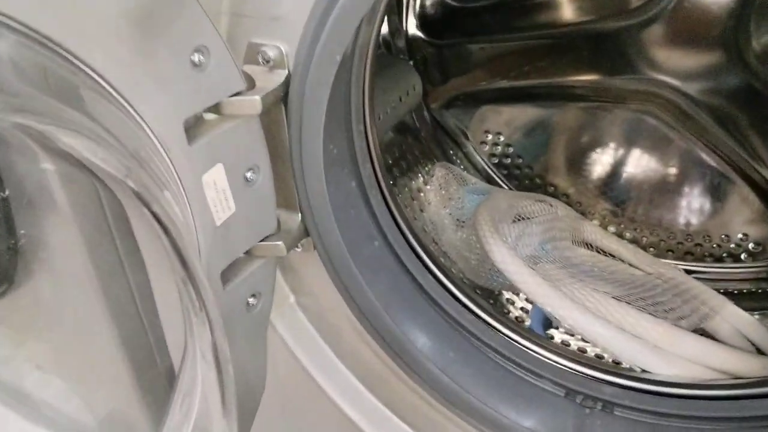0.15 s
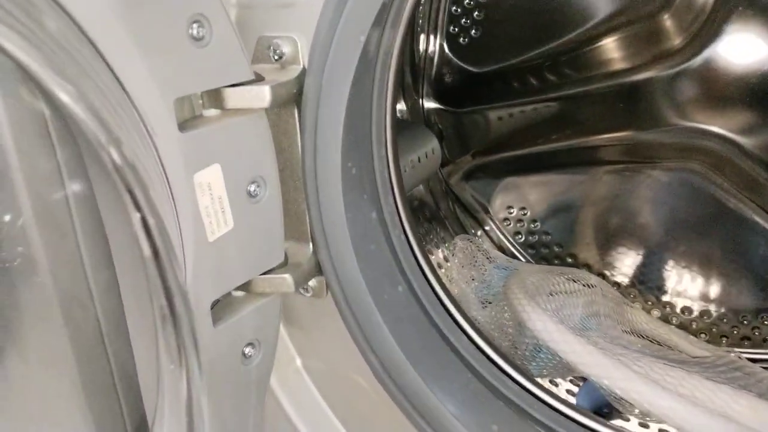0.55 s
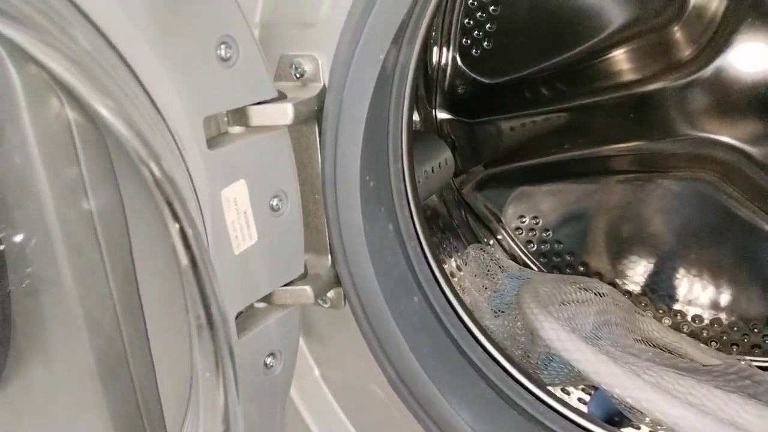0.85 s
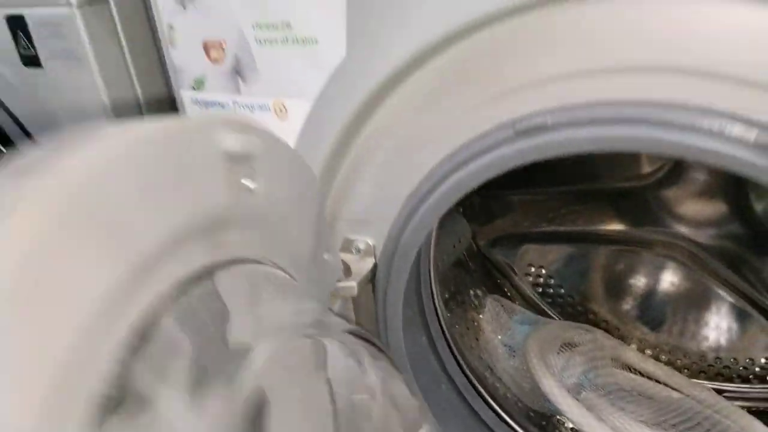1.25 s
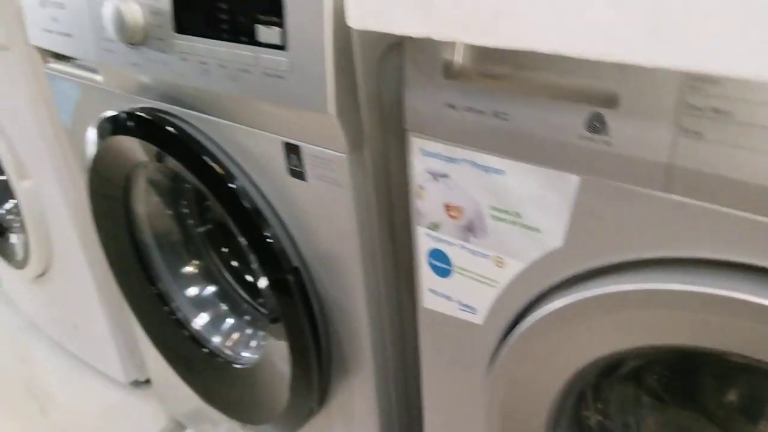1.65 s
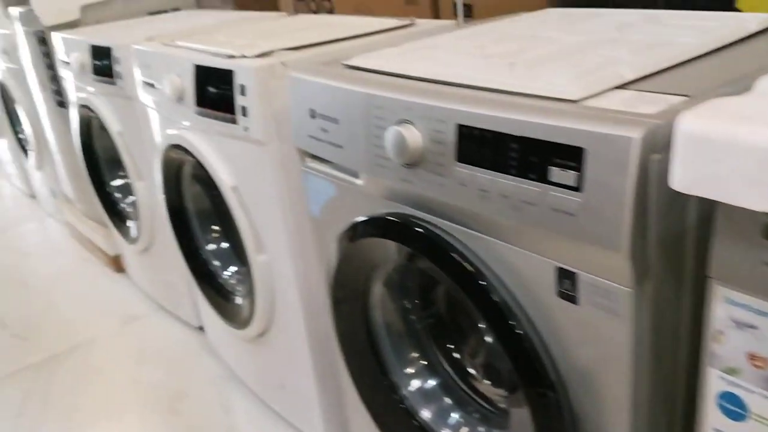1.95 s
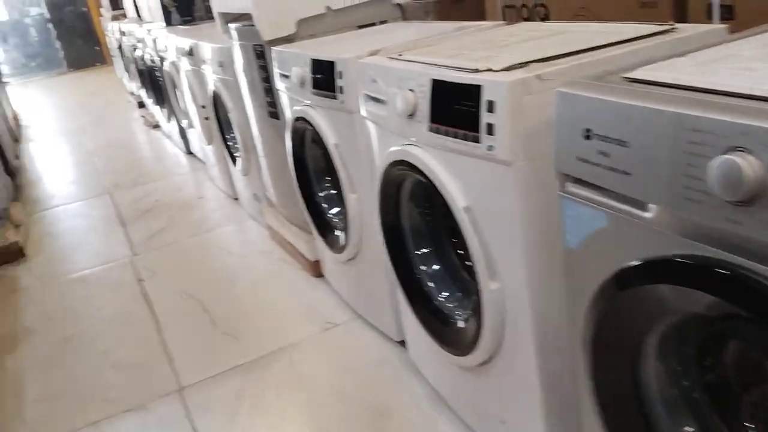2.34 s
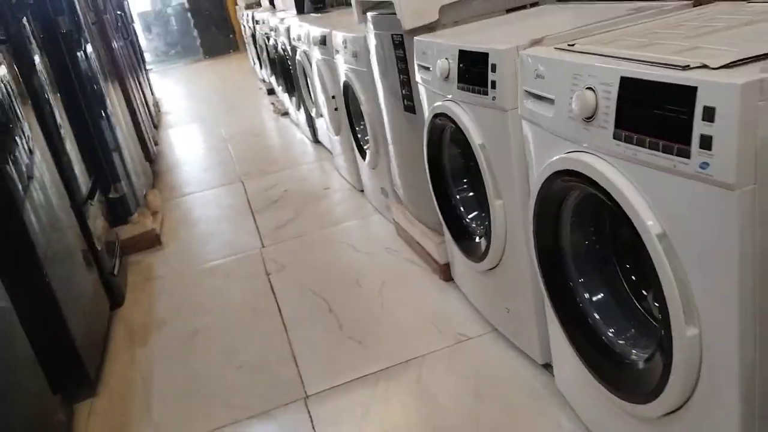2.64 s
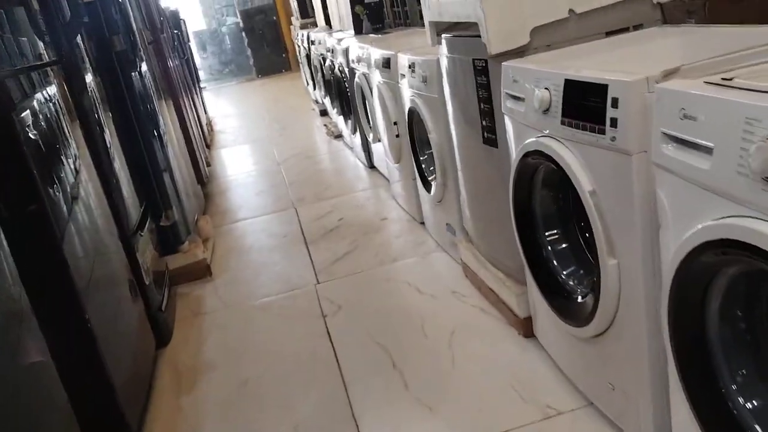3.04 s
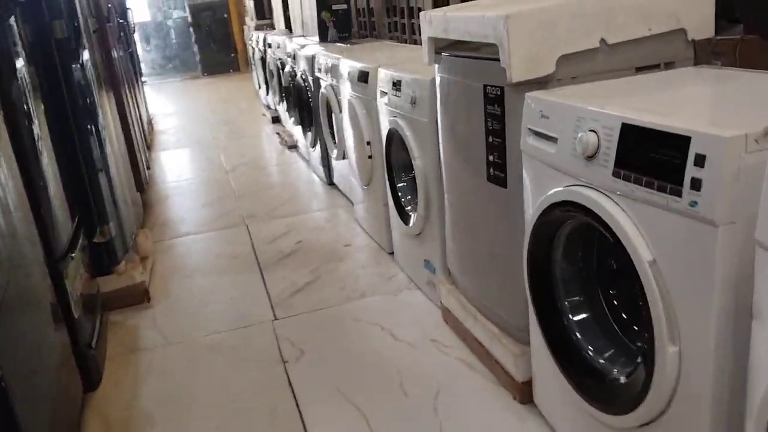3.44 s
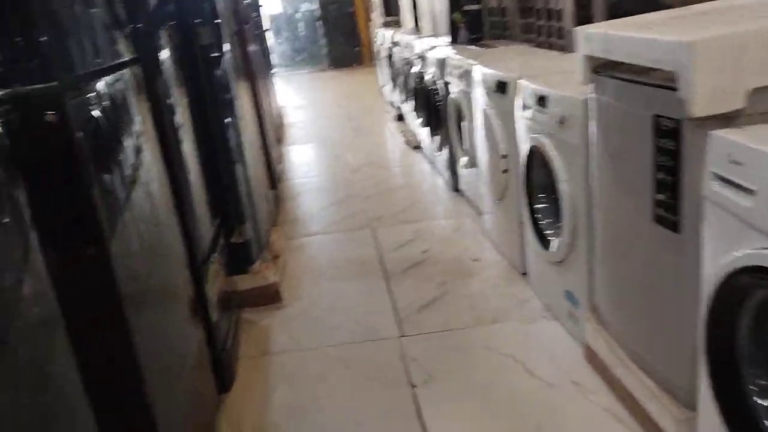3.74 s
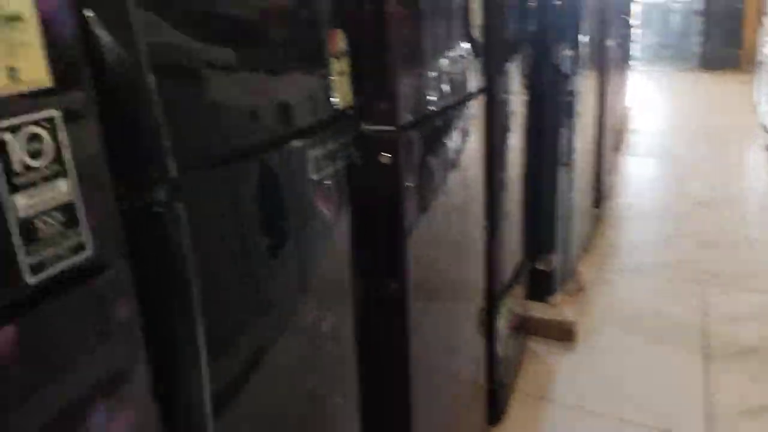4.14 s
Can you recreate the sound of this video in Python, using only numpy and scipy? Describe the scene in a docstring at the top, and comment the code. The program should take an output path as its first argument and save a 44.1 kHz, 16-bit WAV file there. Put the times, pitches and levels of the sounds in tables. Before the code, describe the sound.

Faint distant metal clinks and cloth rustle, then a close appliance door clunks shut and echoes; later, dull bumps on the microphone and sleeve rustling.

```python
"""A showroom's hum and a faint sleeve come first; metal clinks far off, then a washing machine's door shuts close by.
The latch snaps and rings its rim (noise bursts, dying sines), and the cabinet booms into the hall.
Fingers bump the hand-held camera beside its left microphone (dispersed pulses) and the sleeve rustles again.
Cloth, ticks and air are shaped noise; squeaks and hum are wavering sines."""
import sys
import numpy as np
from scipy import signal
from scipy.fft import rfft, irfft
from scipy.io import wavfile
from scipy.ndimage import uniform_filter1d

SR = 44100
rng = np.random.default_rng(int(sys.argv[2]) if len(sys.argv) > 2 else 0)


def file_out(sig):
    """Save sig as 16-bit WAV at sys.argv[1]."""
    # one column per channel
    cols = np.atleast_2d(sig).T
    # limit, then scale
    lim = np.clip(cols, -1, 1)
    pcm = np.round(lim * 32767).astype(np.int16)
    wavfile.write(sys.argv[1], SR, pcm)


N = 188994  # length [samples]


def amp(db):
    """Decibels to gain."""
    return 10 ** (np.asarray(db) / 20)


def unit(x):
    """Scales to rms 1."""
    return x / np.sqrt(np.mean(x ** 2) + 1e-20)


def read(points, hz):
    """Reads a table on a log-frequency axis."""
    f, value = np.transpose(points)
    return np.interp(np.log(hz + 1), np.log(f + 1), value)


def add(mix, s, sound):
    """Mixes a sound in at time s [s]."""
    part = mix[..., max(round(s * SR), 0):][..., :sound.shape[-1]]
    part += sound[..., :part.shape[-1]]


def ring(x, response):
    """Convolves, keeping the length."""
    full = signal.fftconvolve(np.atleast_2d(x), np.atleast_2d(response), axes=1)
    return full[:, :x.shape[-1]]


def fade(t, t60):
    """Exponential decay that falls 60 dB in t60 [s]."""
    return np.exp(-np.log(1000) * t / t60)


def modes(table, t):
    """One dying sine for each mode, as rows."""
    return np.array([amp(db) * np.sin(2 * np.pi * hz * t) * fade(t, t60) for hz, db, t60 in table])


def wander(rate_hz, channels=1):
    """Slow random motion of rms 1: noise without its fast part."""
    hz = np.fft.rfftfreq(N, 1 / SR)
    noise = rfft(rng.standard_normal((channels, N)))
    return unit(irfft(noise * np.exp(-(hz / rate_hz) ** 2), N))


# likeness of diffuse sound at the left and right microphones: (frequency [Hz], correlation [-1 to 1])
MIC_LIKENESS = [(60, 1), (300, 0.58), (700, -0.12), (1200, -0.62), (3000, .5), (6000, -0.02),
                (12000, -0.12)]


def diffuse(points):
    """Noise of a given spectrum at two microphones, alike in the bass."""
    hz = np.fft.rfftfreq(N, 1 / SR)
    left, other = rfft(rng.standard_normal((2, N)))
    same = np.clip(read(MIC_LIKENESS, hz), -1, 1)
    right = same * left + np.sqrt(1 - same ** 2) * other
    return unit(irfft(np.array([left, right]) * amp(read(points, hz)), N))


def tail(points, t60s):
    """A dense response, of energy 1 on the left, in which each band dies at its own speed."""
    hz, t, z = signal.stft(diffuse(points)[:, :SR * 2], SR, nperseg=512)
    out = signal.istft(z * fade(t, read(t60s, hz)[:, None]), SR)[1]
    return out / np.linalg.norm(out[0])


# the hook's first rattle [s], spacing [s], first level [dB] and weakening [dB/s]
CHATTER_S, CHATTER_GAP_S, CHATTER_DB, CHATTER_FADE_DB_PER_S = 1.758, 0.026, -19.5, 88.5


def chatter(count=3, jitter_s=.002, sway_db=5):
    """The hook's weakening rattles in its catch, as rows (time [s], level [dB], left-right [dB])."""
    late, side = rng.standard_normal((count, 2)).T
    after = np.arange(count) * CHATTER_GAP_S
    times = CHATTER_S + after + jitter_s * late
    levels = CHATTER_DB - CHATTER_FADE_DB_PER_S * after
    return list(zip(times, levels, sway_db * side))


# close by, latch and rim striking home: (time [s], level [dB], left-right [dB])
BLOWS = [(1.6942, -2.5, 6.5), (1.6965, -2, -8.5), (1.6982, -9, -3.5), (1.7025, -1.5, -0.5),
         (1.7075, -5, -5.5), (1.7115, -7, -3.5), (1.7290, -11, -2), (1.7340, -12, -6)]
# snap of the plastic latch: (frequency [Hz], relative density [dB per Hz])
LATCH_SNAP = [(200, -10.5), (500, -7.5), (900, 8), (1300, 7.5), (1650, -43.5), (2200, -5), (3300, 3),
              (4200, 0.5), (5500, -4), (8000, -15.5), (14000, -28), (16500, -4.5)]
# resonances of the latch and the door's rim: (frequency [Hz], level [dB], t60 [s])
RIM_MODES = [(806, -7.5, .18), (942, -2, 0.16), (1100, -9.5, 0.39), (1300, -7.5, 0.24), (2370, -12, 0.07),
             (3080, -9, 0.059), (3215, 2, .04), (3310, -4.5, 0.1), (3594, 3.5, 0.076), (3840, 1, .08),
             (4210, -1.5, .06), (4400, -10.5, 0.094), (4893, -9.5, 0.035), (6330, -13, 0.091)]
# loose panels and glass after a blow: (frequency [Hz], relative density [dB per Hz])
PANEL_SHIVER = [(120, -14), (270, 10), (450, -3), (800, 0.5), (1300, -6.5), (1650, -8.5), (2400, -10.5),
                (3600, -6), (5000, -7), (8000, -16), (15000, -17)]
# how long they shiver: (frequency [Hz], t60 [s])
PANEL_T60 = [(200, 0.61), (1000, 0.34), (4000, 0.36), (12000, 0.13)]


def latch(snap_db=-4, snap_s=0.0016, shiver_db=6, rim_db=-26, detune=0.0089, scuff_db=-40, scuff_s=0.013):
    """The hook rubs up its catch, snaps over and chatters; every blow rings the rim and shakes the panels."""
    t = np.arange(SR // 5) / SR
    out, blows, grit = np.zeros((2, N)), np.zeros(N), diffuse(LATCH_SNAP)
    for k, (s, db, pan_db) in enumerate([*BLOWS, *chatter()]):
        fresh_grit = grit[:, k * len(t):][:, :len(t)]
        burst = amp(snap_db) * fresh_grit * np.exp(-t / snap_s)
        # each blow's rim modes are detuned at random, so the ring is dense
        detuned = [(hz * (1 + detune * rng.standard_normal()), level, t60) for hz, level, t60 in RIM_MODES]
        rim = amp(rim_db) * modes(detuned, t).sum(0)
        sides_db = np.array([[pan_db], [-pan_db]]) / 2
        add(out, s, (burst + rim) * amp(db + sides_db))
        add(blows, s, amp([db]))
    # the rub grows until the first blow
    before = BLOWS[0][0] - np.arange(N) / SR
    scuff = grit * np.exp(-abs(before) / scuff_s) * (before > 0)
    shiver = ring(blows, tail(PANEL_SHIVER, PANEL_T60))
    return out + amp(scuff_db) * scuff + amp(shiver_db) * shiver


SEATED_S = 1.6975  # the moment the door's weight lands on the cabinet
# the seal grips the door and mutes the cabinet's ringing: delay after landing [s], onset [s], change [dB]
MUTE_AFTER_S, MUTE_S, MUTE_DB = 0.15, .05, -5
# close by, the door bouncing on its rubber seal: (time [s], level [dB], contact time [s])
SEAL_BOUNCES = [(1.687, -15, .003), (1.705, 3.5, 0.003), (1.712, 1, 0.0047), (1.721, -3, 0.0032),
                (1.732, -3.5, 0.0059), (1.753, 1, 0.0042)]
# cabinet, drum and door: (frequency [Hz], level [dB], t60 [s])
CABINET_MODES = [(69, -9.5, 0.79), (95.6, -1.5, 0.46), (125.5, 1, 0.39), (148, -7, 0.36), (173.6, 1, 0.47),
                 (197, -4, 0.49), (221.7, -3.5, 0.49), (272, -8, 0.55), (316, -2.5, 0.3), (335.5, -4, 0.24),
                 (367, -16.5, 0.32), (390, -13.5, 0.22), (467, -24, 0.15), (540, -17, 0.19),
                 (602, -18.5, 0.5)]


def cabinet(ring_db=-16.5, thud_db=-7, leak_hz=65, rise_s=0.0019):
    """The door's weight rings the steel box until the seal grips; each bounce is a soft half-sine thud."""
    t, boom, thud = np.arange(SR) / SR, np.zeros(N), np.zeros(N)
    grip = amp(MUTE_DB * np.clip((t - MUTE_AFTER_S) / MUTE_S, 0, 1))
    add(boom, SEATED_S, modes(CABINET_MODES, t).sum(0) * (1 - np.exp(-t / rise_s)) * grip)
    for s, db, contact in SEAL_BOUNCES:
        push = np.sin(np.linspace(0, np.pi, round(contact * SR)))
        add(thud, s, amp(db) * push)
    leak = signal.butter(1, leak_hz, "highpass", fs=SR, output="sos")
    return amp(ring_db) * boom - amp(thud_db) * signal.sosfilt(leak, thud)


# fingers on the case by the left microphone: (time [s], peak [dB], corner above which it is dull [Hz])
FINGER_BUMPS = [(2.6372, -11, 1090), (2.6391, -9.5, 877), (2.727, -30.5, 400), (2.8252, -2, 805),
                (3.239, -20.5, 593), (3.3684, -21.5, 1200), (3.3737, -6, 760), (3.3860, -29, 700)]
# spectrum of a bump: (frequency [Hz], relative density [dB per Hz])
BUMP_SPECTRUM = [(20, -13), (50, 2), (100, 4.5), (200, 4.5), (400, -3), (1000, -8), (2000, -20.5),
                 (5000, -18), (15000, -65)]
# what reaches the right microphone: (frequency [Hz], gain [dB])
ACROSS_CASE = [(60, -37), (200, -23.5), (500, -7.5), (1000, -15), (5000, -15)]
# skin scuffing the case round each bump: (frequency [Hz], relative density [dB per Hz])
SKIN_SCUFF = [(40, -2), (150, 9), (700, -3), (1300, -8.5), (2200, -24), (6000, -46), (12000, -50)]


def bumps(spread=0.0727, size=8192, skin_db=-24, skin_s=0.0067, skin_right_db=-12):
    """Knocks travel through the case as bending waves: treble arrives first, bass trails."""
    hz, out = np.fft.rfftfreq(size, 1 / SR), np.zeros((2, N))
    lead = size // 4  # room for the early treble [samples]
    # delay falls as 1 / sqrt(frequency); 1500 Hz arrives at the listed time
    shift_s = lead / SR - spread / np.sqrt(1500)
    travel = np.exp(-2j * np.pi * (2 * spread * np.sqrt(hz) + hz * shift_s))
    skin = diffuse(SKIN_SCUFF) * amp([[0], [skin_right_db]])
    for s, db, corner_hz in FINGER_BUMPS:
        wave = travel * amp(read(BUMP_SPECTRUM, hz)) / np.sqrt(1 + (hz / corner_hz) ** 4)
        pair = irfft([wave, -wave * amp(read(ACROSS_CASE, hz))])
        add(out, s - lead / SR, amp(db) * pair / abs(pair).max())
        out += amp(db + skin_db) * skin * np.exp(-abs(np.arange(N) / SR - s) / skin_s)
    return out


def uneven(x, patchy_db=3):
    """Random gains, smoothed over time and frequency, make the noise uneven."""
    z = signal.stft(x, nperseg=1024)[2]
    patches = uniform_filter1d(rng.standard_normal(z.shape[1:]), size=5, axis=0)
    patches = uniform_filter1d(patches, size=4, axis=1)
    return unit(signal.istft(z * amp(patchy_db * unit(patches)))[1][:, :N])


STROKE_STEEPNESS = 2.4  # a stroke speeds up and slows down along a bell; higher is squarer
CLOTH_REST_DB = -79  # the faint brushing of cloth that never lies quite still
# sleeve strokes as the arm swings the door, draws back and carries the camera:
# (middle [s], half length [s], level [dB], crispness [dB])
SLEEVE_STROKES = [(0.113, 0.18, -61.5, -9), (0.52, 0.2, -65.5, -2), (1.101, 0.03, -52.5, -20),
                  (1.207, 0.066, -63, -8), (1.296, 0.046, -48.5, -5), (1.399, 0.058, -47.5, 5.5),
                  (1.479, 0.024, -49.5, 5.5), (1.655, .055, -61, 3.5), (1.885, 0.095, -65, 9.5),
                  (2.512, 0.057, -61, -13.5), (2.661, 0.045, -59.5, -9), (2.883, 0.046, -67.5, -16.5),
                  (3.282, .10, -66.5, -10), (3.45, 0.038, -67.5, -19.5), (3.867, 0.033, -63, -18.5),
                  (4.058, 0.035, -49, 6), (4.181, 0.027, -53, -1), (4.28, 0.033, -54, -15)]
# soft brushing of cloth: (frequency [Hz], relative density [dB per Hz])
CLOTH_BRUSH = [(500, -13.5), (1500, -6.5), (2500, -7.5), (3500, -3.5), (4600, 0), (6500, -2.5),
               (8000, -12.5), (10000, -17.5)]
# its crisp top: (frequency [Hz], relative density [dB per Hz])
CLOTH_SWISH = [(2500, -22.5), (5000, -2.5), (7500, -16), (10000, -14), (14000, -11), (16000, -9.5)]
# low rub as strokes tug at the camera: (frequency [Hz], relative density [dB per Hz])
CAMERA_TUG = [(60, -19), (130, 0.5), (280, -3.5), (500, -21), (2000, -50.5)]


def sleeve(brush_db=0.0, swish_db=-1, tug_db=-7, grain_db=1.0):
    """Cloth strokes swell and fade as soft brushing, crisp swish and low rub; the weave catches unevenly."""
    t, soft, crisp = np.arange(N) / SR, np.full(N, amp(CLOTH_REST_DB)), np.zeros(N)
    for middle, half, db, crisp_db in SLEEVE_STROKES:
        speed = np.exp(-abs((t - middle) / half) ** STROKE_STEEPNESS / 2)
        soft = np.hypot(soft, amp(db) * speed)
        crisp = np.hypot(crisp, amp(db + crisp_db) * speed ** 2)
    brush, swish = uneven(diffuse(CLOTH_BRUSH)), uneven(diffuse(CLOTH_SWISH))
    low = amp(brush_db) * brush + amp(tug_db) * diffuse(CAMERA_TUG)
    weave = amp(grain_db * wander(150))
    return (soft * low + amp(swish_db) * crisp * swish) * weave


# light ticks of the door and the grip: (time [s], level [dB], centre [Hz], decay [s])
DOOR_GRIP_TICKS = [(.695, -54.5, 1870, 0.013), (1.028, -47.5, 1670, 0.012), (1.425, -46.5, 2340, .005),
                   (2.8, -44, 3580, 0.0012), (2.8049, -44, 3576, 0.00088), (3.197, -57.5, 5000, 0.0069),
                   (3.820, -59, 6450, 0.0053)]


def ticks():
    """Short plastic clicks: noise bursts, each round one broad resonance."""
    t, out = np.arange(SR // 10) / SR, np.zeros((2, N))
    for s, db, hz, decay in DOOR_GRIP_TICKS:
        grit = diffuse([(hz / 4, -18), (hz * .7, -8), (hz, 0), (hz * 1.4, -10), (16000, -26)])
        add(out, s, amp(db) * grit[:, :len(t)] * np.exp(-t / decay))
    return out


# thin squeaks, first of the swinging door, then from down the aisle:
# (start [s], end [s], frequency [Hz], level [dB])
SQUEAKS = [(1.243, 1.264, 1500, -51), (1.32, 1.473, 1477, -67.5), (3.869, 4.326, 3300, -70),
           (3.88, 4.20, 3710, -71), (4.086, 4.154, 3310, -56.5), (4.194, 4.27, 3295, -57)]


def squeal(waver=0.53):
    """Thin wavering tones that swell and fade."""
    t, out = np.arange(N) / SR, np.zeros((2, N))
    for start, end, hz, db in SQUEAKS:
        arch = np.sqrt(abs(np.sin(np.pi * np.clip((t - start) / (end - start), 0, 1))))
        unsteady = 1 + waver * wander(27, channels=2)
        out += amp(db) * arch * np.sin(2 * np.pi * hz * t) * unsteady
    return out


# metal scraped far across the hall and left ringing: (time [s], level [dB])
FAR_CLINKS = [(.453, -44), (.55, -50)]
# its partials: (frequency [Hz], level [dB], t60 [s])
METAL_MODES = [(1200, -14, 3.4), (1336, -0.5, 0.9), (1390, -1.5, 0.83), (1764, -8, .9), (2008, -14.5, 5.4),
               (2363, 2.5, 0.57), (2560, -17, 0.67), (2966, 2.5, 1.1), (3430, -7, 0.97), (3580, -9, .61),
               (3930, -4.5, 1), (4180, -12.5, 1.5), (4410, -11, 1.7), (4540, -7.5, 0.95), (5100, -14, 0.69),
               (5362, -12.5, 1.2), (5730, -5, 0.41), (6600, -12, 0.53), (6900, -12, 0.45)]
# dense weak ringing between those modes: (frequency [Hz], relative density [dB per Hz])
METAL_BETWEEN = [(500, -6), (1300, 2), (1900, -6.5), (2700, 2.5), (4400, 1.5), (5000, -4.5), (6600, -12.5),
                 (8000, -25.5)]


def clink(swell_s=0.01, blur_hz=24, wash_db=-6, wash_t60=1.0, damped_s=0.56):
    """Far metal heard mostly through the hall, so each partial swells in, blurs and is damped."""
    t, out = np.arange(N) / SR, np.zeros((2, N))
    sound = amp(wash_db) * diffuse(METAL_BETWEEN) * fade(t, wash_t60)
    for hz, db, t60 in METAL_MODES:
        a, b, c = wander(blur_hz, channels=3)
        drift = np.array([a + 1j * b, a + 1j * c]) / 2  # echo level and phase, partly shared by both microphones
        partial = (drift * np.exp(2j * np.pi * hz * t)).real
        sound = sound + amp(db) * partial * fade(t, t60)
    envelope = (1 - np.exp(-t / swell_s)) / (1 + (t / damped_s) ** 3)
    for s, db in FAR_CLINKS:
        add(out, s, amp(db) * sound * envelope)
    return out


# hiss above HISS_HZ fades as the camera walks in between the rows of machines from WALK_S on
HISS_HZ, WALK_S, HISS_FADE_DB_PER_S = 1400, 2.4, 3.5
# the hall's rumble and air: (frequency [Hz], relative density [dB per Hz])
HALL_AIR = [(4, -38), (18, -5), (35, 3), (65, 3.5), (100, -7), (200, -11.5), (300, -16.5), (450, -29.5),
            (1200, -25), (2000, -35), (4000, -37), (6500, -52.5), (9000, -50), (15000, -65)]
# the hum in it: (frequency [Hz], level [dB])
HALL_HUM = [(59, -51), (75, -59.5)]


def background(air_db=-48.0, hum_waver=0.26):
    """Ventilation rumble as noise with an unsteady low hum; its hiss dims down the aisle."""
    t, hz = np.arange(N) / SR, np.fft.rfftfreq(N, 1 / SR)
    hum = sum(amp(db) * np.sin(2 * np.pi * f * t) * (1 + hum_waver * wander(0.5)) for f, db in HALL_HUM)
    air = amp(air_db) * diffuse(HALL_AIR) * amp(0.44 * wander(1.8))
    rumble = irfft(rfft(air) / (1 + (hz / HISS_HZ) ** 4), N)
    hiss = air - rumble
    return hum + rumble + hiss * amp(-HISS_FADE_DB_PER_S * np.maximum(t - WALK_S, 0))


# the hall's echo: (frequency [Hz], relative level [dB])
HALL_ECHO = [(100, -14.5), (300, -11.5), (550, -3.5), (1200, -0.5), (2500, 4), (5000, -7), (8000, -3.5),
             (15000, -3)]
# how long it lasts: (frequency [Hz], t60 [s])
HALL_DECAY = [(150, 0.64), (1000, 0.71), (3000, 0.9), (5500, 1.61), (9000, 0.63), (15000, 0.18)]


def hall_echo(sent):
    """The hall answers with a dense echo whose bands die at different speeds."""
    return ring(sent, tail(HALL_ECHO, HALL_DECAY))


# imbalance of the two microphones: (frequency [Hz], left-right [dB])
MIC_IMBALANCE = [(60, 1.5), (300, -1), (1000, 0), (2500, 2.5), (4500, 9), (6200, 10), (8000, -1),
                 (10500, -9.5), (14000, 0)]


def microphones(air):
    """Each microphone takes half of the left-right imbalance, with opposite sign."""
    lean_db = read(MIC_IMBALANCE, np.fft.rfftfreq(N, 1 / SR)) / 2
    return irfft(rfft(air) * amp([lean_db, -lean_db]), N)


def scene(door_wet_db=-17, tick_wet_db=-6, cloth_wet_db=-14):
    """Airborne sounds reach both microphones; the bumps come through the camera's case."""
    door, small, cloth = latch() + cabinet(), ticks(), sleeve()
    echo = hall_echo(amp(door_wet_db) * door + amp(tick_wet_db) * small + amp(cloth_wet_db) * cloth)
    air = door + small + cloth + echo + clink() + squeal() + background()
    return microphones(air) + bumps()


EDGE_HZ = 15700  # upper band limit


def record(dry):
    """Peaks flatten at full scale; then a steep low-pass limits the band."""
    edge = signal.firwin(511, EDGE_HZ, window=("kaiser", 9), fs=SR)
    return signal.oaconvolve(np.clip(dry, -1, 1), edge[None], "same")


dry = scene()
out = record(dry)
file_out(out)
```